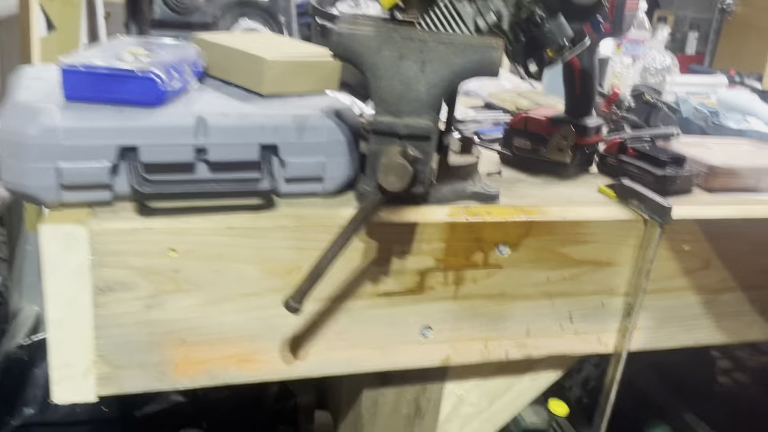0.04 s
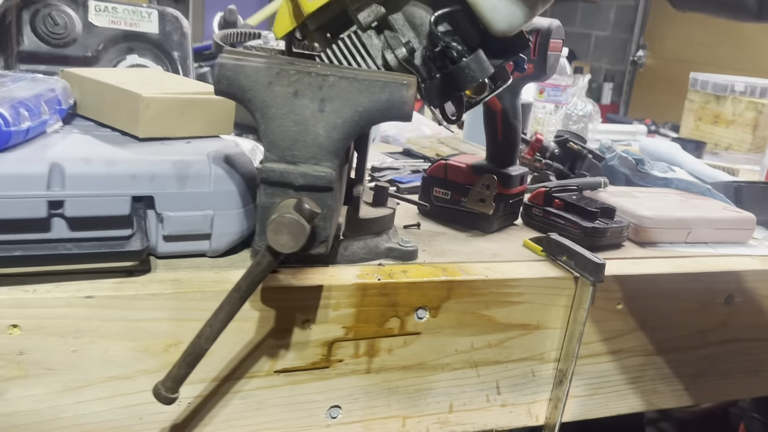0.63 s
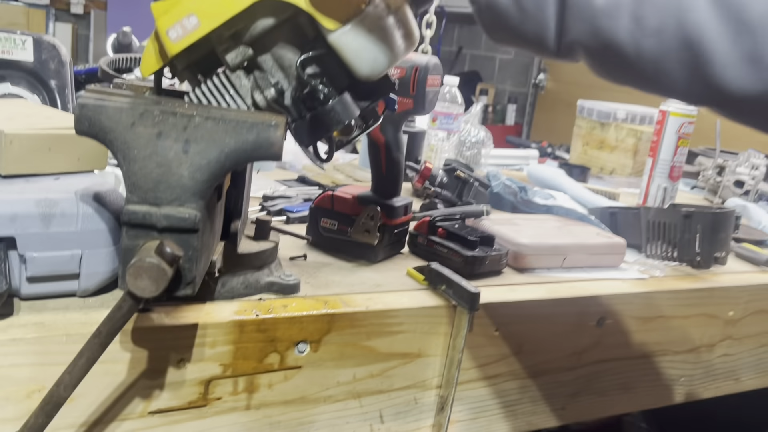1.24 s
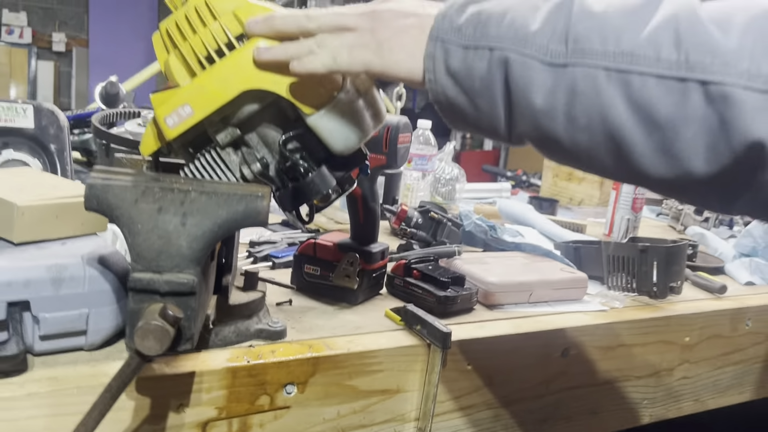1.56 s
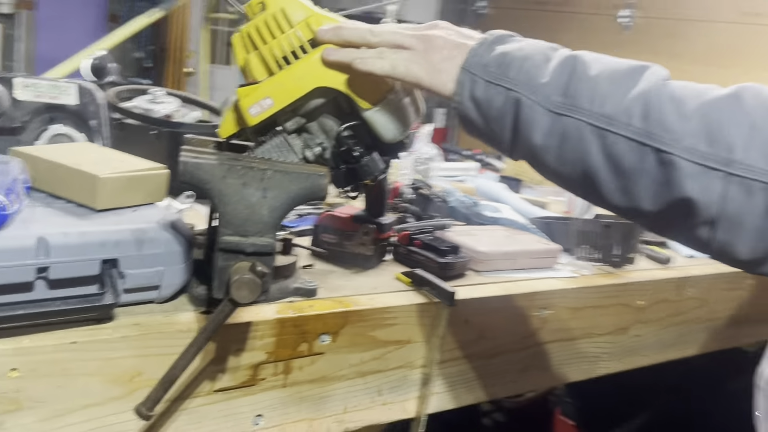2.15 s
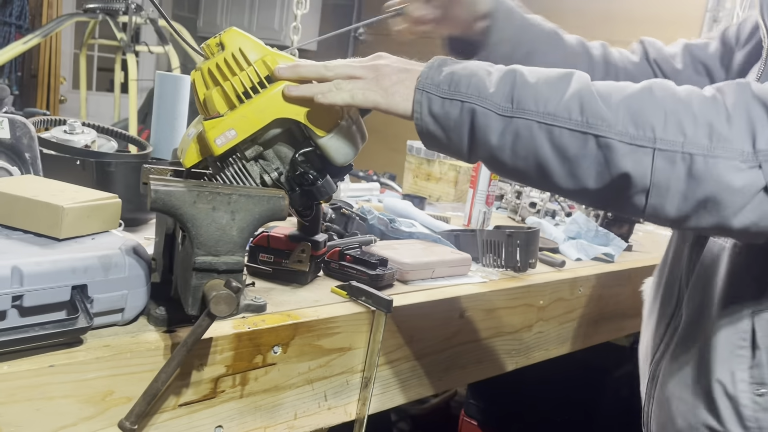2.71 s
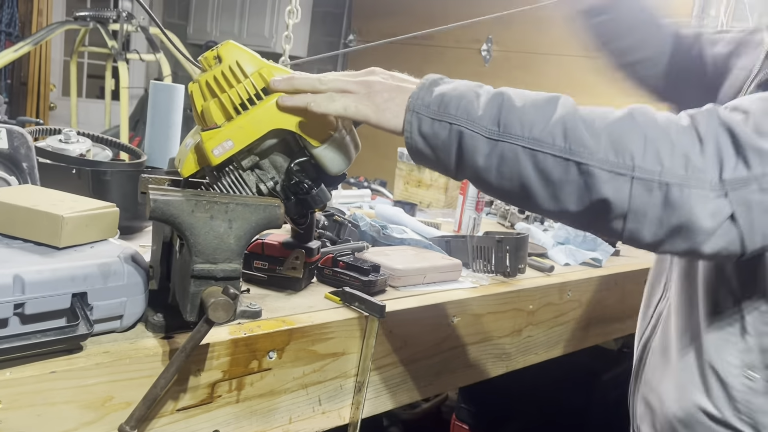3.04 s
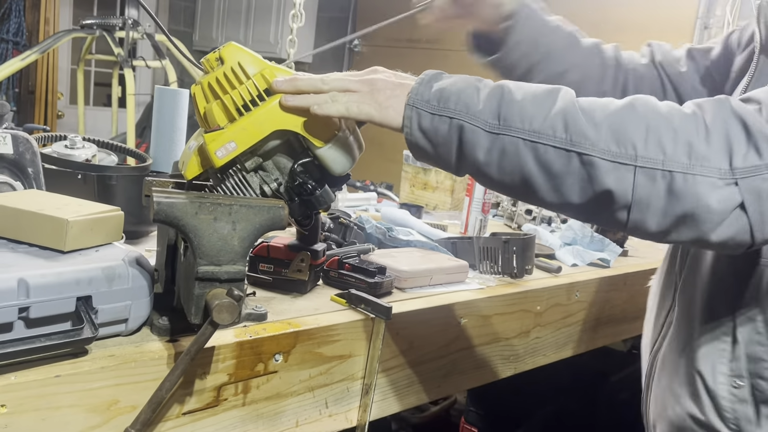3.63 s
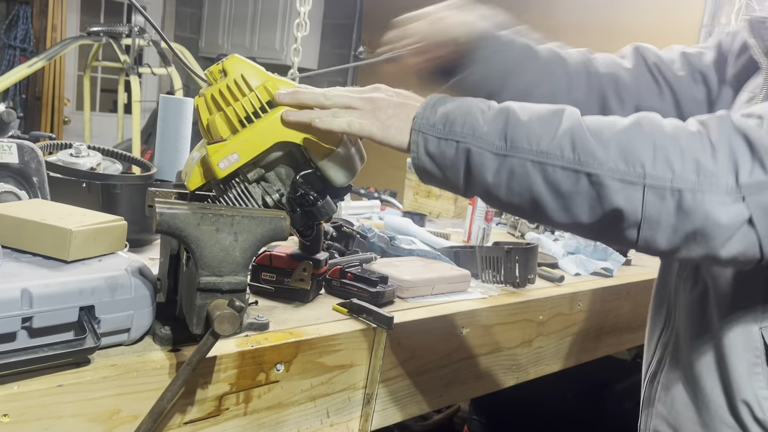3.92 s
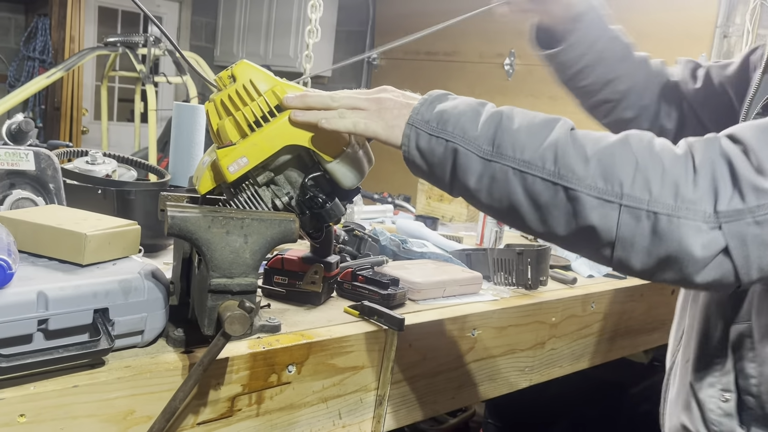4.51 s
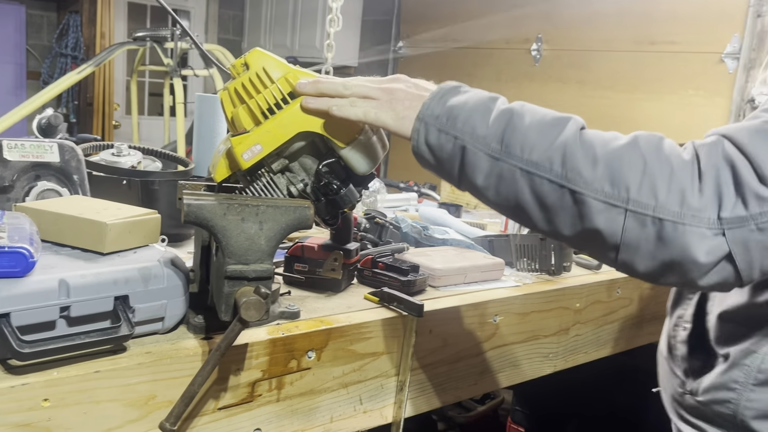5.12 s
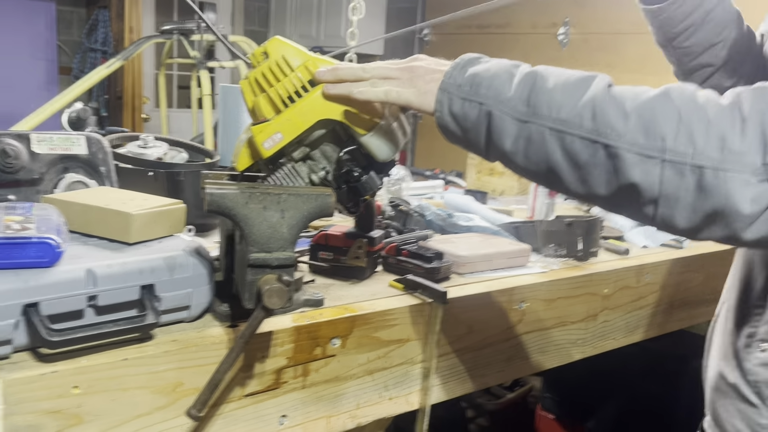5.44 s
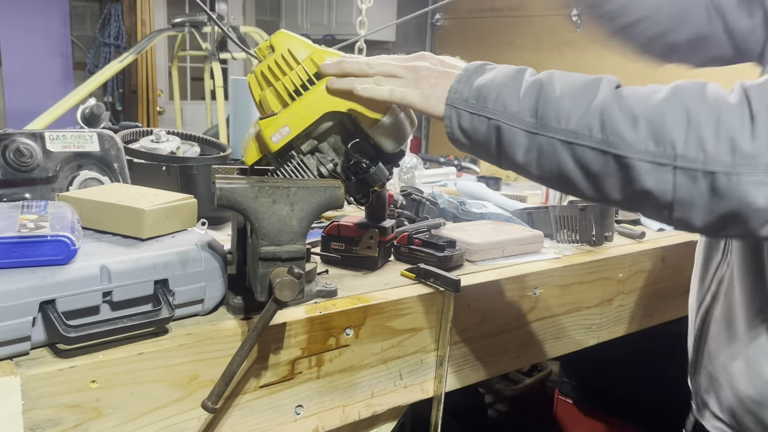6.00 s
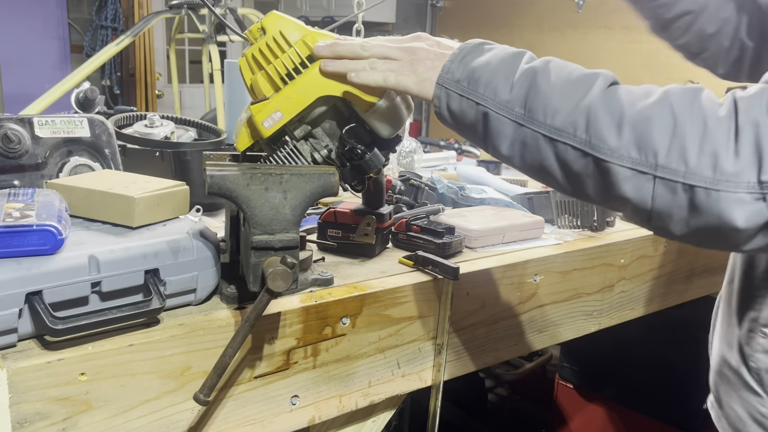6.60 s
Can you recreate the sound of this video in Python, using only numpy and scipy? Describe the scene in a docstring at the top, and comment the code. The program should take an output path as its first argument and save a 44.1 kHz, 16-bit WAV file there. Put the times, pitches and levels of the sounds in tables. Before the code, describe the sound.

Close by in a slightly echoing garage, a recoil starter ticks, then its cord is yanked again and again. Every yank rasps and snaps taut, and the small engine turns over in a brief burst of soft chugging without firing. The cord rewinds each time with ratcheting clicks and a faintly ringing spring, and the plastic handle occasionally clacks home. After five full pulls comes a weak, short sixth and more ticking.

```python
"""A small two-stroke engine, clamped to a garage bench, is pulled over six times and does not catch.
Each stroke releases compressed air through the muffler as a puff; the puffs slow as the engine coasts.
Friction makes the starter cord hiss, rasp and squeak as it is drawn out, and it snaps taut with a crackle.
As it winds back, the pawls tick by impact, the pulley rattles and the steel of the recoil rings in its
natural modes. The bench thuds, the handle clacks, and the garage adds echoes and reverberation."""
import sys
import numpy as np
from scipy import signal
from scipy.fft import rfft, irfft, next_fast_len
from scipy.io import wavfile
from scipy.ndimage import uniform_filter1d

SR = 44100
rng = np.random.default_rng(int(sys.argv[2]) if len(sys.argv) > 2 else 0)


def unload_audio(sound):
    """Save the sound as a 16-bit wav file, at the path given as the first command line argument."""
    columns = np.transpose(np.atleast_2d(sound))
    # keep every value between -1 and 1, then stretch to whole-number steps
    steps = np.round(np.clip(columns, -1, 1) * 32767)
    wavfile.write(sys.argv[1], SR, steps.astype(np.int16))


N = 298116

# natural modes of the recoil's steel: (frequency [Hz], level [dB], time to fall 60 dB [s])
STEEL_MODES = [(3175, -6, 0.23), (3644, -8, 0.14), (3905, 7, 0.18), (5157, -1, 0.24), (7013, -1, 0.18)]
# response of the pulley and its plastic housing: (frequency [Hz], level [dB])
HOUSING_SPECTRUM = [(50, -10.5), (100, 1), (250, -1), (450, -3), (650, -3.5), (1000, 1.5), (1350, -5),
                    (1700, -2.5), (2500, -10), (4000, -9.5), (8000, -34)]
# the engine turning over, one row a pull: (first puff time [s], strokes [count], first rate [1/s],
# top rate [1/s], clutch drag per stroke [1/s^2], first puff level [dB], coasting level [dB])
ENGINE_TURNS = [(.9261, 8, 31.92, 31.9, 364, 5.8, 1), (2.0673, 10, 35.33, 38.9, 271.3, 5.5, -4.5),
                (3.0932, 11, 37.52, 41.46, 255.6, 5, -5), (4.0267, 10, 36.06, 38.84, 269.5, 5, -2.5),
                (4.9572, 9, 35.58, 37.95, 301.7, 5, -3), (6.055, 3, 50.8, 45.9, 270, -15, 1)]
# the cord drawn out, one row a pull: (tug time [s], level [dB], rasp time [s], level [dB], length [s],
# snap time [s], level [dB], length [s], time of rest [s], pulley level [dB], hiss level [dB])
CORD_PULLS = [(.778, -36, .804, -26, .045, 1.014, -19.5, .028, 1.29, -33, -38),
              (1.901, -31, 1.989, -26, .031, 2.137, -10.5, .0074, 2.48, -35.5, -39),
              (2.946, -27.5, 3.035, -23.5, .021, 3.159, -10.5, .0055, 3.51, -37, -40),
              (3.893, -34.5, 3.974, -24, .0076, 4.103, -13.5, .011, 4.41, -36, -37.5),
              (4.801, -37.5, 4.881, -25, .03, 5.034, -13, .006, 5.37, -36, -37),
              (5.959, -33, 6.0487, -14, .013, 6.066, -13.5, .014, 6.12, -39, -37)]
# the cord winding back: (start [s], change of pace [s], end [s], tick rate at each of the three [1/s],
# early tick level [dB], late tick level [dB], pulley level [dB], hiss level [dB])
CORD_REWINDS = [(.0744, .229, .5, 34.6, 47.6, 17.3, -15.5, -19.5, -38, -43),
                (1.3165, 1.525, 1.57, 65.7, 39.7, 14.6, -15, -16, -40, -46),
                (2.5072, 2.572, 2.84, 67.2, 46.7, 25.8, -17.5, -20.5, -40, -39),
                (3.548, 3.648, 3.79, 69.6, 44.9, 18.3, -18, -19, -42, -49),
                (4.4692, 4.549, 4.75, 60.4, 42.2, 19, -19, -22, -44, -44),
                (5.4498, 5.478, 5.84, 39.1, 28.6, 22.6, -20, -23.5, -48, -48),
                (6.3983, 6.524, 6.75, 24.6, 32, 31.4, -21, -19.3, -49, -46)]


def amp(db):
    """Amplitude ratio of a level in decibels."""
    return 10 ** (np.asarray(db) / 20)


def unit_rms(x):
    """Normalisation to an rms of 1."""
    return x / np.sqrt(np.mean(x ** 2) + 1e-20)


def curve_at(points, hz):
    """Interpolation of (frequency, value) points over log frequency."""
    f, value = np.transpose(points)
    return np.interp(np.log(hz + 1), np.log(f + 1), value)


def add(mix, s, sound):
    """Superposition of a sound on the mix at time s."""
    part = mix[max(round(s * SR), 0):][:len(sound)]
    part += sound[:len(part)]


def coloured(x, spectrum, size=4096):
    """Minimum-phase filtering, of unit energy, with the given spectral shape."""
    log_gain = np.log(amp(curve_at(spectrum, abs(np.fft.fftfreq(size, 1 / SR)))))
    response = np.exp(np.conj(signal.hilbert(log_gain)))
    taps = np.fft.ifft(response).real[:size // 2]
    return signal.oaconvolve(x, taps / np.linalg.norm(taps))[:N]


def gritty(grit_db, size):
    """Random amplitude modulation breaks noise into grains about size samples long."""
    noise = rng.standard_normal(N)
    grains = unit_rms(uniform_filter1d(rng.standard_normal(N), size))
    return unit_rms(noise * amp(grit_db * grains))


def envelope(start, end, rise_s, fall_s):
    """Exponential growth up to start, a hold until end, then exponential decay."""
    first, last = np.clip([round((start - 10 * rise_s) * SR), round((end + 10 * fall_s) * SR)], 0, N)
    t = np.arange(first, last) / SR
    shape = np.exp(-np.maximum(start - t, 0) / rise_s - np.maximum(t - end, 0) / fall_s)
    return np.pad(shape, (first, N - last))


def room_air(db=-48):
    """Steady random noise, strongest in the bass, is the garage's noise floor."""
    # spectrum of the still garage: (frequency [Hz], level [dB])
    air_spectrum = [(25, -42), (55, 2.5), (90, 9.5), (150, -4), (360, -9), (850, -9.5), (1600, -14),
                    (3400, -24.5), (8500, -18.5), (11000, -49), (15000, -78)]
    return amp(db) * coloured(rng.standard_normal(N), air_spectrum)


def cord_friction(rise_s=.016, fall_s=.04, take_up_s=.03, coast_s=.025, yank_after_s=.07):
    """Friction follows motion: envelopes of pulley rub and cord hiss, surging at each yank."""
    # slack cord sliding through the eyelet: (start [s], end [s], pulley level [dB], hiss level [dB])
    slack_slides = [(.01, .06, -41, -42), (.76, .8, -41, -42), (6.15, 6.34, -48, -47)]
    # the cord zipping home after the second rewind: (time [s], pulley level [dB], hiss level [dB])
    zip_home = [(1.42, -44, -48), (1.498, -31, -30), (1.546, -25, -17), (1.594, -29.5, -20.5),
                (1.67, -35, -29.5), (1.72, -55, -54)]
    motions = []
    for (tug, *_, rest, rub_db, hiss_db), (first_puff, *_) in zip(CORD_PULLS, ENGINE_TURNS):
        yank = first_puff + yank_after_s
        surge = 1 + amp([[5.5], [10]]) * envelope(yank, yank, rise_s=.05, fall_s=.04)  # rub, hiss
        drawing = envelope(tug + take_up_s, rest, rise_s, fall_s)
        motions.append(amp([[rub_db], [hiss_db]]) * surge * drawing)
    for start, _, end, *_, rub_db, hiss_db in CORD_REWINDS:
        motions.append(amp([[rub_db], [hiss_db]]) * envelope(start, end - coast_s, rise_s, fall_s))
    for start, end, rub_db, hiss_db in slack_slides:
        motions.append(amp([[rub_db], [hiss_db]]) * envelope(start, end, rise_s=.035, fall_s=fall_s))
    times, *levels = np.transpose(zip_home)
    zipping = amp([np.interp(np.arange(N) / SR, times, db) for db in levels])
    motions.append(zipping * envelope(times[0], times[-1], rise_s, fall_s))
    return np.max(motions, axis=0)


def scraping(low_hz, high_hz, per_s, cycles, size_db, count=60):
    """Stick-slip friction as a Poisson process: each slip is a damped tone that glides a little."""
    out = np.zeros(N)
    for hz in np.geomspace(low_hz, high_hz, count) * rng.uniform(1.0, 1.02, count):
        age = np.arange(0, 4, hz / cycles / SR)  # in units of cycles / hz seconds
        turns = cycles * age * (1 + rng.uniform(-.042, .033) * age)
        slip = np.sqrt(hz) * (1 - np.exp(-6 * age)) * np.exp(-2 * age) * np.sin(2 * np.pi * turns)
        times = rng.uniform(0, N / SR, rng.poisson(per_s / count * N / SR))
        for s, strength in zip(times, np.minimum(rng.exponential(size=500), 2)):
            add(out, s, amp(size_db * strength) * slip)
    return unit_rms(out)


def cord(scrape_db=-4.5, hiss_db=-2, fibre_db=-8):
    """Sliding friction: the pulley rattles on its post and the cord's fibres hiss through the eyelet."""
    # spectrum of the sliding cord: (frequency [Hz], level [dB])
    hiss_spectrum = [(500, -20), (2000, -21), (4000, 2.5), (5800, -1.5), (8500, 3.5), (9800, 6.5),
                     (10700, -25), (12500, -6), (13700, -79), (16000, -55)]
    rub, hiss = cord_friction()
    pulley = coloured(rub * gritty(5.6, size=220), HOUSING_SPECTRUM)
    pulley += amp(scrape_db) * rub * scraping(642.6, 3214, per_s=320, cycles=16, size_db=5)
    fibres = amp(hiss_db) * coloured(hiss * gritty(1.9, size=120), hiss_spectrum)
    fibres += amp(fibre_db) * hiss * scraping(2702, 9180, per_s=400, cycles=40.5, size_db=11)
    return pulley + fibres


def ticks(first_extra_db=2, scatter_db=.6):
    """Ratchet action: a pawl drops once per tooth, at the hand's pace. Yields (time [s], level [dB])."""
    for start, turn, end, *rates, early_db, late_db, _, _ in CORD_REWINDS:
        t = np.arange(start, end, 1 / SR)
        teeth = np.cumsum(np.interp(t, [start, turn, end], rates)) / SR
        for s in np.interp(np.arange(teeth[-1]), teeth, t):
            db = np.interp(s, [start, end], [early_db, late_db]) + first_extra_db * (s == start)
            yield s, db + scatter_db * rng.standard_normal()


def pawls(db=-6.3, decay_s=.0064, steel_db=-29.5, ping_db=-10, bounce_db=-6.5, housing_db=-14):
    """Impact excitation: each pawl drops, bounces once, knocks the housing and rings the steel."""
    # single pawls dropping as the pulley stops or reverses: (time [s], level [dB])
    single_drops = [(.0277, -18.5), (.5828, -26), (1.166, -16), (1.1844, -17.5), (1.6733, -20.5),
                    (1.7274, -23.5), (1.93, -20.5), (2.3436, -16), (2.3598, -16), (3.398, -19),
                    (4.3017, -17.5), (4.344, -21.5), (5.1407, -15), (5.2502, -16.5), (5.2717, -16.5),
                    (5.2943, -16), (6.357, -26.5)]
    # spectrum of a pawl's impact: (frequency [Hz], level [dB])
    tick_spectrum = [(150, -40.5), (600, 2.5), (1000, -4), (1700, 1.5), (2600, -5.5), (4300, 4.5),
                     (6000, 1), (7500, 2.5), (9300, 7.5), (10500, -9), (12500, 1.5), (14000, -31),
                     (16000, -14)]
    t = np.arange(SR // 6) / SR
    brief = t[:SR // 20]
    chatter, ring = np.zeros((2, N))
    for s, tick_db in [*ticks(), *single_drops]:
        ping = np.sin(2 * np.pi * rng.uniform(6800, 9700, size=(3, 1)) * brief).sum(axis=0)
        bounce_s = .005 * rng.uniform(.6, 1.6)
        for late, blow_db in ((0, 0), (bounce_s, bounce_db)):
            blow = rng.standard_normal(len(brief)) + amp(ping_db) * ping
            add(chatter, s + late, amp(db + tick_db + blow_db) * np.exp(-brief / decay_s) * blow)
        for hz, mode_db, t60 in STEEL_MODES:
            strength = amp(steel_db + tick_db + mode_db + 6 * rng.uniform(-1.04, 1))
            add(ring, s, strength * amp(-60 * t / t60) * np.sin(2 * np.pi * (hz * t + rng.random())))
    return coloured(chatter, tick_spectrum) + amp(housing_db) * coloured(chatter, HOUSING_SPECTRUM) + ring


def clinks(rise_s=.003, decay_s=.02):
    """Resonance: a coil drags over an edge and briefly sustains one mode of the steel."""
    # single modes ringing out: (time [s], frequency [Hz], level [dB], length [s])
    held_modes = [(.104, 3200, -42, .04), (.152, 5150, -37, .025), (.221, 3170, -36, 0.025),
                  (1.345, 3630, -33.5, 0.11), (1.351, 3190, -41, 0.059), (1.365, 5160, -35, .06),
                  (3.741, 7010, -35, 0.016)]
    t = np.arange(SR // 3) / SR
    out = np.zeros(N)
    for s, hz, db, length in held_modes:
        held = (1 - np.exp(-t / rise_s)) * np.exp(-np.maximum(t - length, 0) / decay_s)
        add(out, s, amp(db) * held * np.sin(2 * np.pi * hz * t))
    return out


def recoil_spring(db=-5.7, waver_db=4.5, wander_hz=13, rise_s=.005, ring_s=.028):
    """Frictional excitation: coils slide on each other and drive all the steel's modes unevenly."""
    # the coils slipping: (time [s], level [dB], length [s])
    coil_slips = [(.14, -46, .1), (.491, -39, .02), (1.175, -37, .04), (1.345, -30, .025), (1.43, -35, .06),
                  (1.5, -29.5, .075), (2.335, -35, .035), (2.53, -39, .1), (2.946, -38, .01),
                  (3.568, -30, .027), (3.62, -39, .035), (4.3, -41, .02), (4.478, -33, .025),
                  (4.57, -43, .03), (5.265, -32, .055), (5.59, -44, .02), (6.5, -48, .25)]
    t = np.arange(N) / SR
    knots = np.arange(0, N / SR + .1, .018)  # level and pitch take a new course every 18 ms
    modes = np.zeros(N)
    for hz, mode_db, _ in STEEL_MODES:
        swell, wander = (np.interp(t, knots, row) for row in rng.standard_normal((2, len(knots))))
        phase = 2 * np.pi * np.cumsum(hz + wander_hz * wander) / SR
        modes += amp(mode_db + waver_db * swell) * np.sin(phase)
    return modes * sum(amp(db + slip_db) * envelope(s + rise_s, s + length, rise_s, ring_s)
                       for s, slip_db, length in coil_slips)


def snaps(db=-1, rise_share=.16, decay_s=.0089):
    """Impulsive tension: the cord bites into its coils with a crackle that knocks the housing."""
    # spectrum of the crackle: (frequency [Hz], level [dB])
    snap_spectrum = [(200, -18), (900, -3), (2500, -8.5), (4300, 1), (6000, -1.5), (8800, 6), (9800, 3),
                     (10700, -9.5), (12500, -7), (13700, -51), (16000, -35)]
    t = np.arange(SR // 8) / SR
    crackle, knock = np.zeros((2, N))
    for tug, tug_db, rasp, rasp_db, rasp_s, taut, taut_db, taut_s, *_ in CORD_PULLS:
        # three jerks a pull: (time [s], level [dB], length [s], relative knock level [dB])
        jerks = [(tug, tug_db, .007, 1.5), (rasp, rasp_db, rasp_s, -1), (taut, taut_db, taut_s, -11)]
        for s, jerk_db, length, knock_db in jerks:
            rise = 1 - np.exp(-t / (rise_share * length))
            strain = amp(db + jerk_db) * rise * np.exp(-np.maximum(t - length, 0) / decay_s)
            add(crackle, s, strain)
            add(knock, s, amp(knock_db) * strain)
    return (coloured(crackle * gritty(2.6, size=30), snap_spectrum)
            + coloured(knock * gritty(1.4, size=30), HOUSING_SPECTRUM))


def rasps(db=-10, rise_s=.008, fall_s=.012):
    """Stick-slip under load: the cord's coils scrape over each other as it takes the strain."""
    strain = sum(amp(db + rasp_db) * envelope(s + rise_s, s + length, rise_s, fall_s)
                 for _, _, s, rasp_db, length, *_ in CORD_PULLS)
    return strain * scraping(2900, 4700, per_s=350, cycles=26, size_db=4, count=16)


def strokes(free_per_s=19.32, free_loss_per_s=2.28, settle_strokes=2, stall_db_per_rate=2.4):
    """Inertia against drag: the engine spins, slows and stalls. Yields (time [s], level [dB]) of puffs."""
    for s, count, rate, top_rate, drag, first_db, coast_db in ENGINE_TURNS:
        yield s, first_db
        for k in range(1, round(count)):
            s += 1 / rate
            db = coast_db + (first_db - coast_db) * np.exp(-k / settle_strokes)
            yield s, db - stall_db_per_rate * max(free_per_s - rate, 0)
            if k == 1:
                rate = top_rate
            elif rate > free_per_s + free_loss_per_s:  # the clutch drains kinetic energy
                loss = drag * (.3 if k == 2 else 1)  # less while the arm ends its pull
                rate = np.sqrt(max(rate ** 2 - loss, free_per_s ** 2))
            else:  # running free of the clutch
                rate = max(rate - free_loss_per_s, 10)


def muffler(db=-5, start_hz=850, end_hz=140, fall_s=.002, decay_s=.0057, gas_db=-20, gas_s=.014):
    """Sudden release of compressed air: a thump whose pitch falls with the pressure, and a rush of gas."""
    # spectrum of the escaping gas: (frequency [Hz], level [dB])
    gas_spectrum = [(80, -3), (200, 8.5), (600, -7.5), (900, -2.5), (1400, -6), (2200, -9.5), (4000, -10.5),
                    (9000, -13), (14000, -35.5)]
    t = np.arange(SR // 10) / SR
    turns = end_hz * t + (start_hz - end_hz) * fall_s * (1 - np.exp(-t / fall_s))
    port_opening = 1 - np.exp(-t / .00083)
    thumps, flow = np.zeros((2, N))
    for s, puff_db in strokes():
        detune = 1 + .034 * rng.uniform(-.68, 1)  # no two charges are quite alike
        thump = -np.sin(2 * np.pi * turns * detune)
        add(thumps, s, amp(db + puff_db) * thump * port_opening * np.exp(-t / decay_s))
        add(flow, s, amp(gas_db + 1.17 * puff_db) * port_opening * np.exp(-t / gas_s))
    return thumps + flow * coloured(gritty(3.4, size=20), gas_spectrum)


def boom(x, db=-25):
    """Standing waves: the garage's low modes ring on after each puff."""
    # room modes: (frequency [Hz], level [dB], time to fall 60 dB [s])
    room_modes = [(54.3, -55, .4), (88.5, -20.5, 0.55), (149, -41, 0.1), (363, -58, 0.6),
                  (613.7, -21.5, 0.12)]
    t = np.arange(SR) / SR
    waves = sum(amp(db + mode_db - 60 * t / t60) * np.sin(2 * np.pi * hz * t)
                for hz, mode_db, t60 in room_modes)
    return signal.oaconvolve(x, waves)[:N]


def echoes(x, bench_s=.0053, wall_s=.0231):
    """Early reflections: bench and wall each return a delayed, weaker copy."""
    from_bench, from_wall = (np.pad(x, (round(s * SR), 0))[:N] for s in (bench_s, wall_s))
    return .49 * from_bench - .23 * from_wall


def bench(db=-2, decay_s=.02):
    """Damped vibration: the heavy bench answers a jerk with a dull shudder."""
    # the bench rocking under the engine: (time [s], level [dB])
    thuds = [(1.184, -23), (2.326, -20.5), (2.45, -28), (4.15, -16), (6.088, -22.5)]
    # response of the bench: (frequency [Hz], level [dB])
    bench_spectrum = [(25, -36), (50, 4), (90, 1.5), (160, 0.5), (300, -17), (800, -41), (3000, -56)]
    t = np.arange(SR // 4) / SR
    push = np.zeros(N)
    for s, thud_db in thuds:
        add(push, s, amp(db + thud_db) * np.exp(-t / decay_s) * rng.standard_normal(len(t)))
    return coloured(push, bench_spectrum)


def handle(rise_s=.002, hold_s=.01, decay_s=.008):
    """Damped impact: the plastic handle comes home against the housing with a hollow clack."""
    # the handle striking: (time [s], level [dB])
    strikes = [(1.749, -28), (5.857, -36)]
    # spectrum of the clack: (frequency [Hz], level [dB])
    clack_spectrum = [(150, -16), (700, -12), (1150, 2), (1500, -7), (2100, 0), (3000, -14), (8000, -22),
                      (14000, -45)]
    blows = sum(amp(db) * envelope(s, s + hold_s, rise_s, decay_s) for s, db in strikes)
    return coloured(blows * gritty(1.5, size=30), clack_spectrum)


def squeaks(waver=.015):
    """Periodic stick-slip of the cord in its eyelet gives a brief rising note."""
    # one contour a squeak, each of points: (time [s], frequency [Hz], level [dB])
    contours = [
        [(2.985, 1590, -41), (3.005, 1700, -32), (3.02, 1800, -32), (3.04, 1840, -46)],
        [(3.925, 1627, -35), (3.94, 1635, -34), (3.955, 1800, -40), (3.975, 1730, -50)],
    ]
    out = np.zeros(N)
    for contour in contours:
        s, hz, db = np.transpose(contour)
        t = np.arange(s[0], s[-1], 1 / SR)
        jitter = unit_rms(uniform_filter1d(rng.standard_normal(len(t)), size=60))
        pitch = np.interp(t, s, hz) * (1 + waver * jitter)
        add(out, s[0], amp(np.interp(t, s, db)) * np.sin(2 * np.pi * np.cumsum(pitch) / SR))
    return out


def garage(x, mono_hz=900, build_s=.0096):
    """Diffuse reverberation: each band decays at its own rate, and the bass is alike in both ears."""
    # reverberation of the garage: (frequency [Hz], time to fall 60 dB [s])
    decay_times = [(80, 1), (170, 0.48), (400, 0.41), (1500, 0.16), (5000, 0.2), (9000, 0.13),
                   (15000, 0.32)]
    hz, t, (mid, side) = signal.stft(rng.standard_normal((2, SR)), SR, nperseg=512)
    width = (hz / np.hypot(hz, mono_hz))[:, None]
    field = np.array([mid + width * side, mid - width * side]) / np.hypot(1, width)
    decay = amp(-60 * t / curve_at(decay_times, hz)[:, None])
    tail = signal.istft(field * decay, SR, nperseg=512)[1]
    tail *= 1 - np.exp(-(np.arange(tail.shape[1]) / SR / build_s) ** 2)
    return signal.fftconvolve(x[None], tail / np.linalg.norm(tail[0]), axes=1)[:, :N]


def microphone_pair(x):
    """Level and phase differences between two microphones place the sound in stereo."""
    # level difference: (frequency [Hz], left minus right [dB])
    level_difference = [(60, 1), (110, 2), (200, 0.5), (380, 1.0), (700, 4.5), (1290, 3.5), (2380, 3.5),
                        (4400, 2.5), (8120, 1), (15000, -1)]
    # phase difference: (frequency [Hz], lead of the left [rad])
    phase_lead = [(100, 0), (700, 0.51), (1800, 0.84), (2800, 0.99), (4200, 0.66), (6500, 0.66),
                  (8200, 0.83), (9500, 2.08), (12000, 0.81), (15000, 4.1)]
    size = next_fast_len(N + SR // 10)
    hz = np.fft.rfftfreq(size, 1 / SR)
    left = amp(curve_at(level_difference, hz) / 2) * np.exp(.5j * curve_at(phase_lead, hz))
    return irfft(rfft(x, size) * np.array([left, 1 / left]), size)[:, :N]


def scene():
    """Superposition of engine, starter and room air with the garage's reflections."""
    puffs = muffler()
    exhaust = puffs + echoes(puffs) + boom(puffs)
    starter = pawls() + snaps() + cord() + rasps() + squeaks() + handle() + bench()
    air = room_air()
    near = microphone_pair(exhaust + starter + recoil_spring() + clinks() + air)
    return near + amp(-11) * garage(puffs) + amp(-6.5) * garage(starter)


def record(dry, low_hz=44, high_hz=16300):
    """Band limiting and soft saturation: deep bass is shed, peaks are rounded, the top treble is cut."""
    x = signal.sosfilt(signal.butter(4, low_hz, "highpass", fs=SR, output="sos"), dry)
    rounded = .97 * x / (1 + x ** 6) ** (1 / 6)
    lowpass = signal.firwin(511, high_hz, window=("kaiser", 9), fs=SR)
    return signal.oaconvolve(rounded, lowpass[None], "same")


dry = scene()
out = record(dry)
unload_audio(out)
```